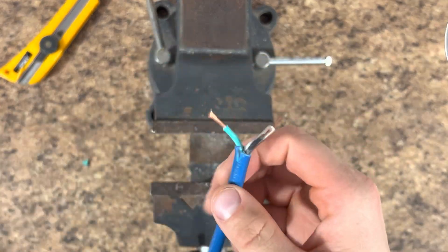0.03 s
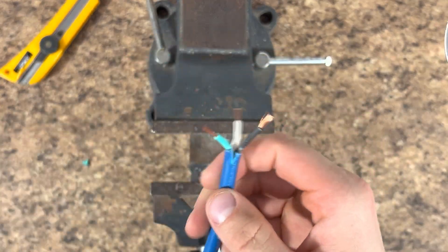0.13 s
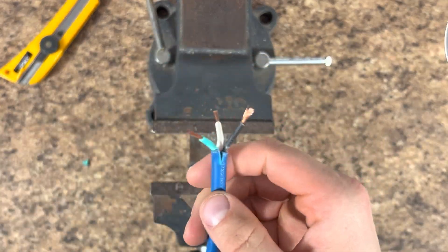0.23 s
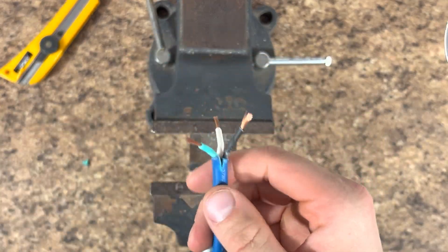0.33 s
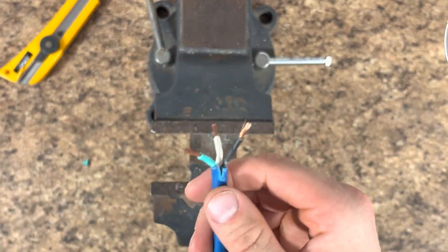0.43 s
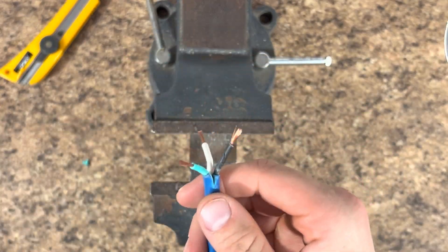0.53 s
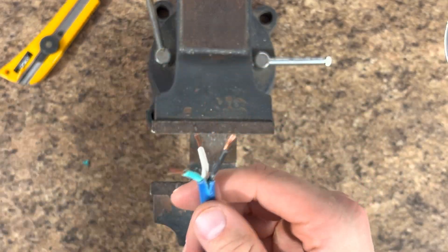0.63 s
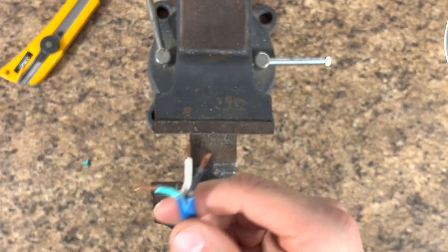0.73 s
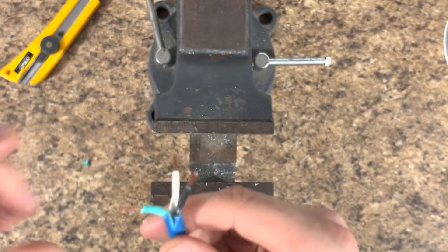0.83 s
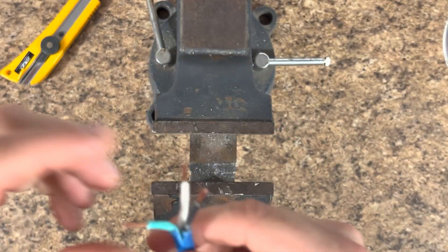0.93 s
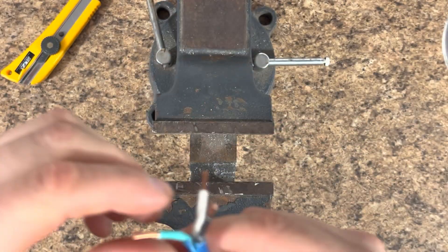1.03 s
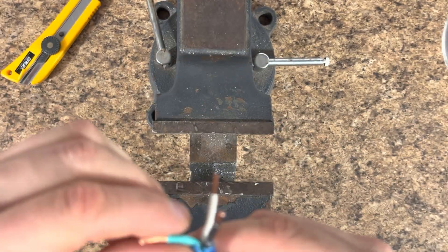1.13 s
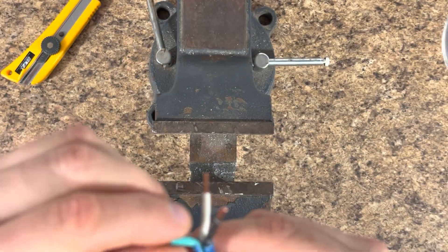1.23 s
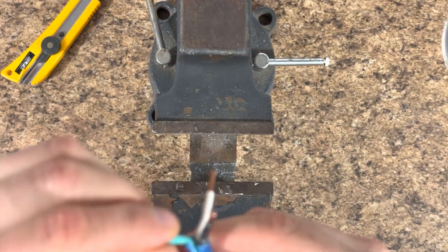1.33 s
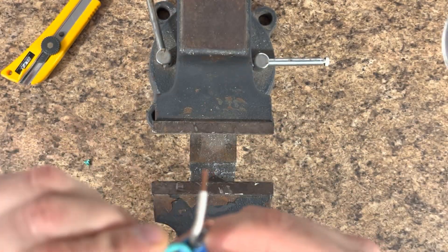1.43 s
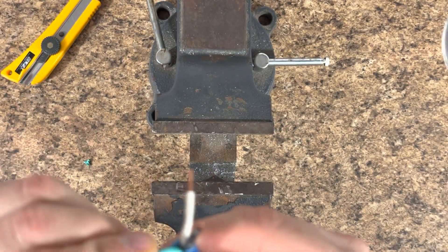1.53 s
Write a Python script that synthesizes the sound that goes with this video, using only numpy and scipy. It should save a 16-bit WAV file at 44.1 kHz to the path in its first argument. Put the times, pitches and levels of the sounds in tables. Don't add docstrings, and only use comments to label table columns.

```python
import sys
import numpy as np
from scipy import signal
from scipy.fft import rfft, irfft, next_fast_len
from scipy.io import wavfile

SR = 44100
rng = np.random.default_rng(int(sys.argv[2]) if len(sys.argv) > 2 else 0)


def put_to_file(sound):
    columns = np.atleast_2d(sound).T
    safe = np.clip(columns, -1, 1)
    whole_steps = np.round(safe * 32767)
    wavfile.write(sys.argv[1], SR, whole_steps.astype(np.int16))


def natural_amplitude(level_db):
    exponent = np.asarray(level_db, float) / 20
    return 10 ** exponent


N = 68355

# pitch_hz, side_minus_mid_db
FIELD_WIDTH = [(60, -25), (160, -21), (300, -11), (550, -4), (1200, -5), (1550, -12), (1900, -30),
               (17000, -30)]


def rms_one(x):
    return x / np.sqrt(np.mean(x ** 2) + 1e-20)


def at_hz(points, hz, column=1):
    points = np.array(points)
    return np.interp(np.log(hz), np.log(points[:, 0]), points[:, column])


def side_gain(hz):
    return natural_amplitude(at_hz(FIELD_WIDTH, hz))


def drift(rate_hz):
    r = np.exp(-80 * np.pi * rate_hz / SR)
    noise = rng.standard_normal(N // 40 + 2002)
    slow = signal.lfilter([1], [1, -2 * r, r * r], noise)[2000:]
    return np.interp(np.arange(N) / 40, np.arange(len(slow)), rms_one(slow))


def band(x, low_hz, high_hz):
    return signal.sosfilt(signal.butter(2, [low_hz, high_hz], "band", fs=SR, output="sos"), x)


def burst(start_s, level_db, t60_s):
    t = np.arange(N) / SR - start_s
    return natural_amplitude(level_db - 60 * np.maximum(t, 0) / t60_s) * (t >= 0)


def clicks(start_s, gain):
    out = np.full(N, 1e-18)
    np.add.at(out, (np.asarray(start_s) * SR).astype(int), gain)
    return out


def ring(x, hz, t60_s):
    r = natural_amplitude(-60 / (t60_s * SR))
    w = 2 * np.pi * hz / SR
    return signal.lfilter([0, np.sin(w)], [1, -2 * r * np.cos(w), r * r], x)


def soft(x, hz):
    return signal.sosfilt(signal.butter(2, min(hz, 19000), fs=SR, output="sos"), x)


def bands(gain_of_band):
    edges = 26 * 2 ** np.arange(0, 9.5, 1 / 3)
    white = rng.standard_normal((2, 2, N + 8000))
    out = 0
    for k, (low_hz, high_hz) in enumerate(zip(edges, edges[1:])):
        noise = band(white[k % 2], low_hz, high_hz)[:, 8000:]
        hz = np.sqrt(low_hz * high_hz)
        out = out + noise * gain_of_band(hz) * [[1], [side_gain(hz)]]
    return out


def struck(modes, start_s, level_db):
    spread_db = 5
    out = np.zeros((2, N))
    for k, (hz, mode_db, t60_s) in enumerate(modes):
        draw = rng.standard_normal((len(start_s), 2))
        gain = (-1) ** k * natural_amplitude(level_db + mode_db + spread_db * draw[:, 0])
        out[0] += ring(clicks(start_s, gain), hz, t60_s)
        out[1] += ring(clicks(start_s, gain * draw[:, 1] * side_gain(hz)), hz, t60_s)
    return out


def room_answer():
    # pitch_hz, level_db per Hz, t60_s, build_up_s
    room = [(55.07, -8, 0.32, 0.017), (140, 0, 0.41, 0.021), (404, -10.5, 0.4, 0.0045),
            (1300, -13, 0.45, 0.0052), (2820, -22.5, 0.41, 0.002), (6500, -42.5, .33, 0.0014),
            (11900, -37, .23, 0.0013), (16000, -50, .17, .004)]
    t = np.arange(N) / SR

    def build_and_die(hz):
        fall_db = 60 * t / at_hz(room, hz, column=2)
        build_up = 1 - np.exp(-(t / at_hz(room, hz, column=3)) ** 2)
        return natural_amplitude(at_hz(room, hz) - fall_db) * build_up

    answer = bands(build_and_die)
    return answer / np.abs(answer).max()


def in_room(x, answer):
    return signal.fftconvolve(x[None], answer, axes=1)[:, :N]


def hiss():
    # pitch_hz, level_db per Hz
    hiss_color = [(30, -35.5), (70, -3), (200, -4.5), (450, -18), (900, -23), (2400, -29), (5000, -57),
                  (15000, -57)]
    patchy_db, level_db = 1.2, -53.5
    noise = bands(lambda hz: natural_amplitude(at_hz(hiss_color, hz) + patchy_db * drift(4)))
    return natural_amplitude(level_db) * rms_one(noise)


def hum():
    # start_s, level_db
    hum_swells = [(0, -47), (.08, -48), (.138, -39), (.21, -48), (.4, -48), (.564, -42), (.69, -50),
                  (.742, -39), (.84, -47), (.95, -40), (1.04, -41), (1.15, -43), (1.24, -44), (1.32, -48),
                  (1.45, -43), (1.49, -50), (1.55, -45)]
    hum_hz, wander_hz = 124.5, 2.0
    level = natural_amplitude(np.interp(np.arange(N) / SR, *np.transpose(hum_swells)))
    turns = np.cumsum(hum_hz + wander_hz * drift(4)) / SR
    return np.sqrt(2) * level * np.sin(2 * np.pi * turns)


def whine():
    whine_hz, level_db = 2335, -83
    return natural_amplitude(level_db + 3 * drift(8)) * np.sin(2 * np.pi * whine_hz * np.arange(N) / SR)


def rumble():
    # start_s, level_db
    rumble_swells = [(0, -65), (.245, -59), (.29, -22.5), (.34, -44), (.42, -39), (.5, -50.5), (.6, -53),
                     (.68, -49.5), (.745, -40), (.84, -50), (.89, -62), (1.0, -49), (1.3, -57.5),
                     (1.45, -53), (1.55, -60.5)]
    center_hz, width_hz = 58, 20
    noise = band(rng.standard_normal(N + SR), center_hz - width_hz / 2, center_hz + width_hz / 2)
    return rms_one(noise[SR:]) * natural_amplitude(np.interp(np.arange(N) / SR, *np.transpose(rumble_swells)))


def low_background():
    return (hum() + whine() + rumble()) * natural_amplitude([[0], [-24]])


def rustle():
    # start_s, level_db
    rustle_swells = [(0, -84), (.075, -74), (.12, -84), (0.198, -72), (.26, -84), (.5, -92.5), (0.799, -81),
                     (1.1, -83.5), (1.18, -101.5), (1.22, -78.5), (1.27, -94), (1.359, -85.5),
                     (1.449, -76.5), (1.55, -79.5)]
    swell = natural_amplitude(np.interp(np.arange(N) / SR, *np.transpose(rustle_swells)))
    noise = rms_one(band(rng.standard_normal(N), 6400, 15500))
    return swell * noise * [[1], [0]]


def ticks():
    # start_s, level_db, low_hz, high_hz, second_slip_db
    strand_slips = [
        (0.8513, -56, 7500, 13100, 0),
        (0.8738, -56.5, 6500, 12500, 5),
        (0.893, -61, 6500, 12800, 4),
        (0.9357, -40.5, 5200, 14000, -4.5),
        (.9570, -55, 6900, 13500, -18),
        (0.966, -51, 10000, 16500, -12),
        (.9909, -55, 7900, 13500, 4),
        (1.025, -58.5, 4000, 13170, 3.5),
        (1.364, -64, 10500, 14060, -16),
    ]
    gap_s, slip_t60_s = .0042, .007
    room_db, room_t60_s = -24, .07
    out = np.zeros(N)
    for start_s, level_db, low_hz, high_hz, second_db in strand_slips:
        shape = burst(start_s, level_db, slip_t60_s)
        shape += burst(start_s + gap_s, level_db + second_db, slip_t60_s)
        shape += burst(start_s, level_db + room_db, room_t60_s)
        noise = shape * rng.standard_normal(N)
        out += band(band(noise, low_hz, high_hz), low_hz, high_hz)
    return out * [[2], [0]]


def knocks(answer):
    # start_s, level_db, low_hz, high_hz
    soft_knocks = [(.0860, -60, 3050, 3550), (.6852, -43, 1500, 4800), (.6880, -37, 220, 520),
                   (.6885, -38, 700, 2800), (.7700, -45, 280, 450), (.7980, -52, 800, 1200),
                   (.9260, -51, 2000, 6500), (.9320, -38, 280, 520), (.9900, -46, 250, 480),
                   (.9925, -42, 900, 3000), (1.0700, -46, 900, 2200), (1.2500, -43, 180, 400),
                   (1.4720, -41, 230, 600)]
    t60_s, cycles = .02, 14.0
    room_db = -25.5
    out = 0
    for start_s, level_db, low_hz, high_hz in soft_knocks:
        shape = burst(start_s, level_db, t60_s + cycles / low_hz)
        thud = shape * rng.standard_normal((2, N)) * [[1], [side_gain(low_hz)]]
        thud = band(thud, low_hz, high_hz)
        thud = thud * natural_amplitude(level_db) / np.abs(thud[0]).max()
        echo = in_room(clicks([start_s], natural_amplitude(level_db + room_db + 21)), answer)
        out = out + band(thud + echo, low_hz, high_hz)
    return out


def lead_in_swell(landing_s):
    start_s, level_db, rise_db, dull_hz = 0.2271, -49, 23.5, 2500
    progress = (np.arange(N) / SR - start_s) / (landing_s - start_s)
    swell = natural_amplitude(level_db + rise_db * np.clip(progress, 0, 1)) * (progress > 0) * (progress < 1)
    lead_in_noise = band(swell * rng.standard_normal(N), 700, 6500)
    dull = np.exp(-2 * np.pi * dull_hz / SR)
    return signal.lfilter([1 - dull], [1, -dull], lead_in_noise) * [[1], [.3]]


def crack(start_s, bench_db):
    crack_db, t60_s = 8.5, 0.0094
    shape = sum(burst(s, db + crack_db, t60_s) for s, db in zip(start_s, bench_db))
    return band(shape * rng.standard_normal(N), 1200, 3000) * [[1], [0]]


def landing(answer):
    # start_s, bench_level_db, steel_level_db
    contacts = [
        (0.2412, -18.5, -31),
        (0.2432, -11.5, -36),
        (0.2454, -17, -17.5),
        (0.2474, -19, -14),
        (0.2534, -20.5, -33.5),
        (0.255, -17.5, -33.5),
    ]
    # pitch_hz, level_db, t60_s
    bench_modes = [(138, -9, .2), (194, 4, .13), (405, -17, .08), (465, -17, .1), (540, -18, .04),
                   (636, -15, .28), (652, -16, .22), (690, -12, .06), (900, -10, .05), (984, -17, .3),
                   (1000, -18, .22), (1100, -13, .06), (1305, -7, .04), (1530, -1, .025)]
    # pitch_hz, level_db, t60_s
    steel_modes = [(1943, 8.5, 0.011), (2930, -5.5, .02), (5300, -8.5, 0.013), (7100, -18.5, 0.017),
                   (7970, 2, 0.0057), (10250, -9.5, .008), (11780, 0, 0.012), (14700, -2, 0.012),
                   (15500, -12.5, .015)]
    contact_hz, room_db = 3500, -22.5
    start_s, bench_db, steel_db = np.transpose(contacts)
    lead_in_noise = lead_in_swell(start_s[0])
    bench = soft(struck(bench_modes, start_s, bench_db), contact_hz)
    steel = struck(steel_modes, start_s, steel_db)
    echo = in_room(clicks(start_s[1:2], natural_amplitude(room_db + 13)), answer)
    return lead_in_noise + bench + steel + crack(start_s, bench_db) + echo


def scene():
    answer = room_answer()
    mid, side = landing(answer) + knocks(answer) + ticks() + low_background() + hiss() + rustle()
    side = signal.sosfilt(signal.butter(6, 1100, fs=SR, output="sos"), side)
    return np.array([mid + side, mid - side])


def roll_off(x):
    return signal.sosfilt(signal.butter(12, 17150, fs=SR, output="sos"), x)


def record(dry):
    # pitch_hz, left_lead_radians
    phase_lead = [(0, 0), (2300, 0), (3300, -.5), (5300, 0), (7400, 0.1), (8300, 1), (9000, 3.1),
                  (9600, 3.4), (14100, 9.4), (15500, 10.9), (22050, 11)]
    low_cut_hz, top_cut_hz, peak = 44, 16800, .8
    x = signal.sosfilt(signal.butter(4, low_cut_hz, "high", fs=SR, output="sos"), dry)
    x = peak * np.tanh(x / peak)
    size = next_fast_len(N + 2048)
    lead = np.interp(np.fft.rfftfreq(size, 1 / SR), *np.transpose(phase_lead))
    turn = np.exp(.5j * lead * np.array([[1], [-1]]))
    x = irfft(rfft(x, size) * turn, size)[:, :N]
    x = signal.sosfilt(signal.cheby2(10, 50, top_cut_hz, fs=SR, output="sos"), x)
    return roll_off(x)


dry = scene()
out = record(dry)
put_to_file(out)
```